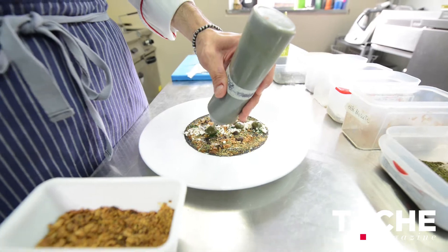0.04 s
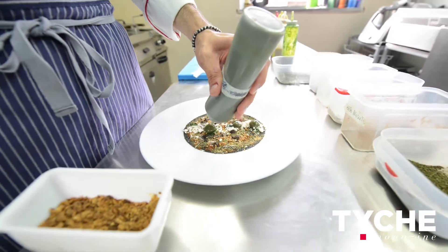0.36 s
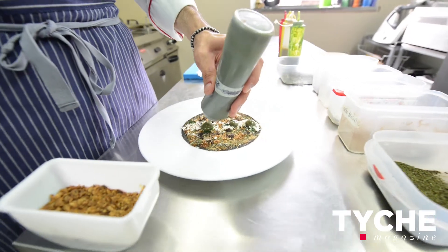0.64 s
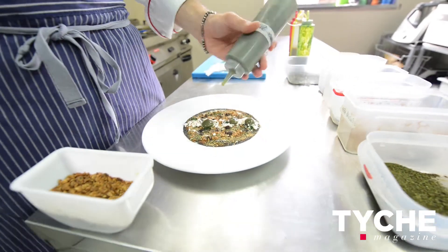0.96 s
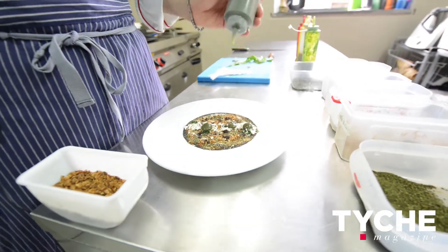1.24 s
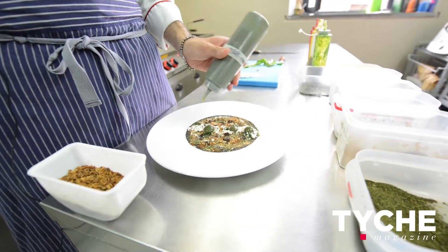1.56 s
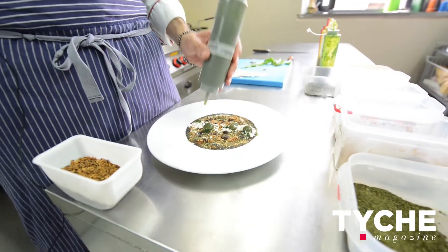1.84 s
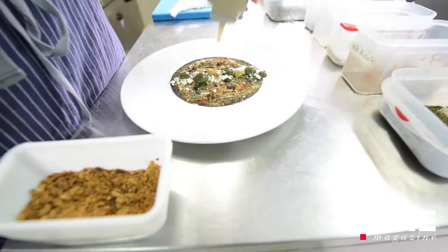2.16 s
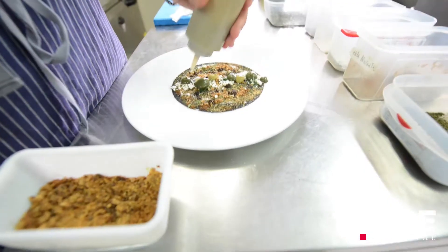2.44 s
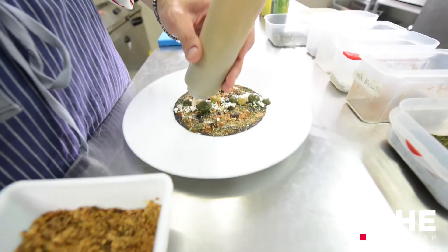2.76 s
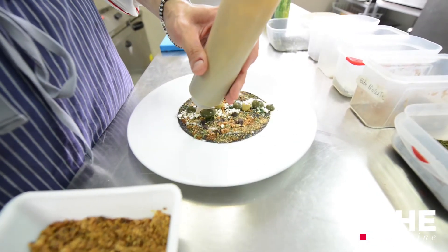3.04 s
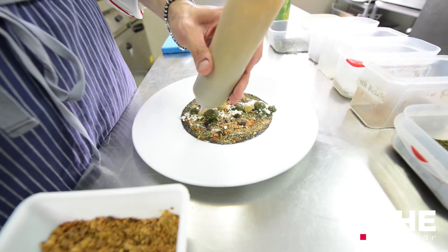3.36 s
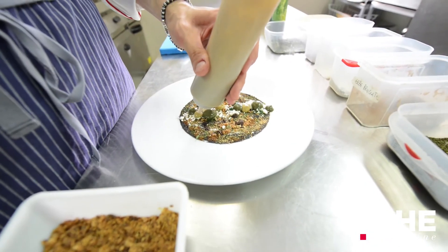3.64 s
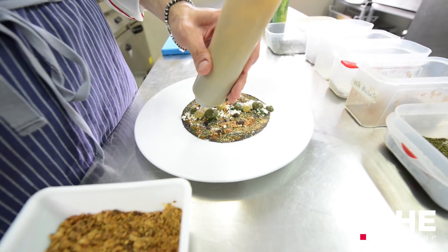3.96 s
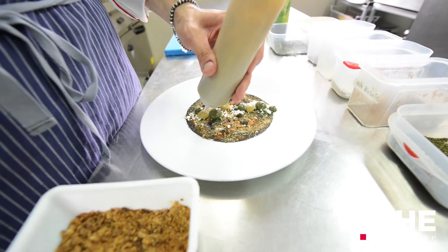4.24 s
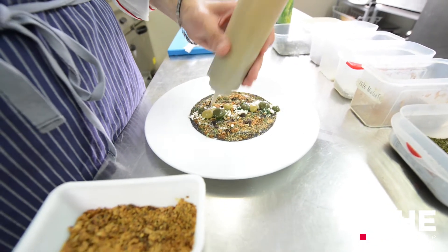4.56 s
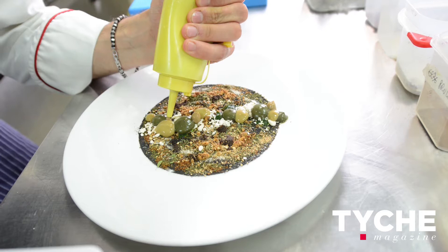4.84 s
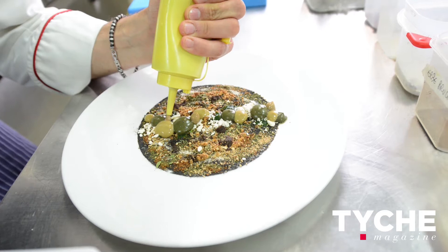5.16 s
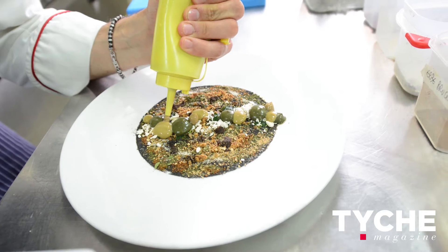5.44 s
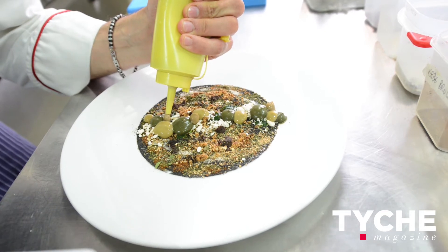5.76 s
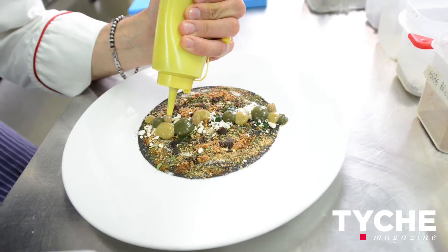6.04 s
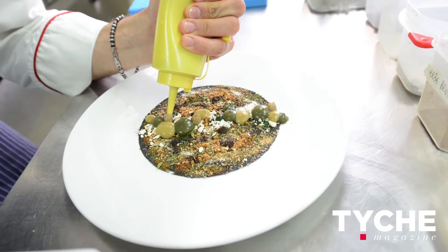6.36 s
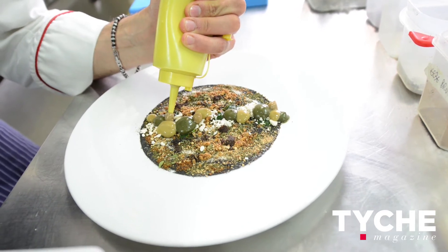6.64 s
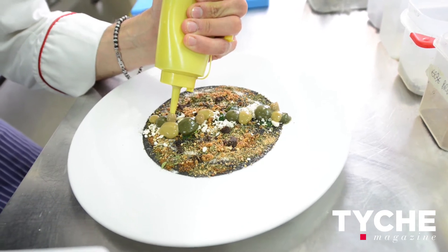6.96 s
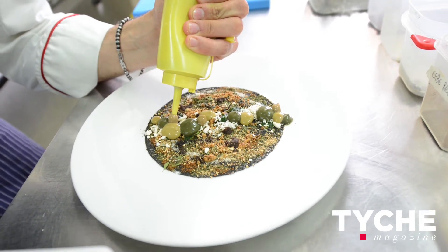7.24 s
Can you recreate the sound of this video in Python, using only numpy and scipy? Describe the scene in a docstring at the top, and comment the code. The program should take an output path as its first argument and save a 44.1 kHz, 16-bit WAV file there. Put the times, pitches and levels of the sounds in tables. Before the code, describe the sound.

Steady ventilation rush and hum in a restaurant kitchen, with faint whistling, fine rapid ticking and two soft container knocks.

```python
"""An extractor fan drones in a restaurant kitchen. Turbulent air rushes and booms in the duct,
the wheel hums at multiples of its shaft speed and grazes metal once a turn with a fine tick,
and motors add thin whistling tones. A container is set down with one soft knock.
The sound runs as a loop of about four seconds, broken once by a short silence."""
import sys
import numpy as np
from scipy import signal
from scipy.fft import rfft, irfft
from scipy.io import wavfile
from scipy.ndimage import uniform_filter1d

SR = 44100
rng = np.random.default_rng(int(sys.argv[2]) if len(sys.argv) > 2 else 0)


def bounce(signal):
    """Save signal as a 16-bit WAV file at the path given by the first command-line argument."""
    frames = np.transpose(np.atleast_2d(signal))
    limited = np.clip(frames, -1, 1)
    pcm = np.round(limited * 32767).astype(np.int16)
    wavfile.write(sys.argv[1], SR, pcm)


N = 326340
LOOP_S, SHAFT_HZ = 4.24, 17.4
LOOP_N = round(LOOP_S * SR)


def gain_of(db):
    """Decibels to a gain factor."""
    return 10 ** (np.asarray(db) / 20)


def unit_rms(x):
    """Scales to rms 1."""
    return x / np.sqrt(np.mean(x ** 2) + 1e-20)


def clock(length_s):
    """Sample times from zero."""
    return np.arange(round(length_s * SR)) / SR


def add(mix, start_s, sound):
    """Mixes a sound in at its start time."""
    part = mix[round(start_s * SR):][:len(sound)]
    part += sound[:len(part)]


def follow(curve, column=1):
    """One column of an automation curve at every sample of the loop."""
    rows = np.array(curve)
    return np.interp(clock(LOOP_S), rows[:, 0], rows[:, column])


def drift(rate_hz):
    """Smooth random modulation of rms 1, rolling off above rate_hz."""
    hz = np.fft.rfftfreq(LOOP_N, 1 / SR)
    spectrum = rfft(rng.standard_normal(LOOP_N)) * (hz > 0)
    return unit_rms(irfft(spectrum / (1 + (hz / rate_hz) ** 4), LOOP_N))


def band_noise(centre_hz, width_hz, size):
    """Noise of rms 1 in one steep-sided band."""
    hz = np.fft.rfftfreq(size, 1 / SR)
    spectrum = rfft(rng.standard_normal(size))
    return unit_rms(irfft(spectrum / (1 + (2 * (hz - centre_hz) / width_hz) ** 4), size))


def tone(hz, db, wander=0.00087):
    """A sine at an rms level, its pitch wandering slightly."""
    cycles = np.cumsum(hz * (1 + wander * drift(rate_hz=3.3))) / SR + rng.random()
    return np.sqrt(2) * gain_of(db) * np.sin(2 * np.pi * cycles)


def swell(x, curve_db):
    """Compresses a sound, then rides its level along a curve."""
    x = unit_rms(x)
    envelope = np.sqrt(uniform_filter1d(x ** 2, SR // 14) + .02)
    return gain_of(curve_db) * x / envelope


def ring(modes, t):
    """The decaying sines of a struck object."""
    return sum(gain_of(db - 60 * t / t60) * np.sin(2 * np.pi * (hz * t + rng.random()))
               for hz, db, t60 in modes)


def kitchen(x, wet_db, t60):
    """Direct sound plus dense reflections from steel and tiles."""
    t = clock(.4)
    tail = rng.standard_normal(len(t)) * gain_of(-60 * t / t60) * (t > .003)
    reverb = signal.fftconvolve(x, tail)[:len(x)]
    return x + gain_of(wet_db) * np.std(x) * unit_rms(reverb)


def air_rush(flutter_db=0.47, low_cut_hz=22):
    """Turbulent air, lifted at the duct's resonances; its level rides on the flow."""
    # broadband bed of the rush: f/Hz, density/(dB per Hz)
    bed = [(15, -44), (45, -75), (75, -52.5), (130, -48.5), (220, -52), (380, -55.5), (700, -55.5),
           (1500, -64.5), (2700, -72), (4400, -80), (6600, -82.5), (9800, -84.5), (11500, -88.5),
           (15500, -88)]
    # steady resonances of duct and room: f/Hz, width/Hz, peak density/(dB per Hz)
    resonances = [(30.4, 5.6, -49), (101.5, 9.7, -45), (108.5, 8.1, -56), (253, 58, -54.5),
                  (367, 14.4, -53.5), (488, 4.2, -50.5), (2680, 270, -76), (6580, 550, -87),
                  (9550, 500, -89)]
    # nearly even air flow with a few brief sags: t/s, level/dB
    flow = [(0.0, -0.06), (1.7, 0.0), (1.84, -2.2), (2.0, 0.04), (3.26, 0.0), (3.82, 0.1), (3.96, -1.0),
            (4.08, 0.8), (4.24, -1.5)]
    hz = np.fft.rfftfreq(LOOP_N, 1 / SR)
    bed_hz, bed_db = np.transpose(bed)
    power = gain_of(np.interp(np.log(hz + 1), np.log(bed_hz), bed_db)) ** 2
    for centre, width, db in resonances:
        power += gain_of(db) ** 2 / (1 + (2 * (hz - centre) / width) ** 4)
    power *= 1 - 1 / (1 + (hz / low_cut_hz) ** 10)
    phases = np.exp(2j * np.pi * rng.random(len(hz)))
    rush = irfft(np.sqrt(power * LOOP_N * SR / 2) * phases, LOOP_N)
    return rush * gain_of(follow(flow) + flutter_db * drift(rate_hz=16))


def duct_booms(low_trim_db=-0.5, upper_trim_db=-2.5, blades=11, throb_hz=7.2, throb_db=1.5):
    """Turbulence drives two throbbing booms in the duct; the upper one carries the blade tone."""
    # swells of the low boom: t/s, level/dB
    low_swells = [(0.0, -40), (0.38, -25.5), (0.46, -28), (0.56, -29.2), (2.06, -28), (2.14, -34),
                  (2.4, -32), (2.58, -37), (2.94, -26), (3.24, -28), (3.34, -23), (3.56, -28.5),
                  (3.68, -26.5), (4.24, -29)]
    # swells of the upper boom: t/s, level/dB
    upper_swells = [(0.0, -17), (0.12, -32), (0.22, -22.5), (0.86, -29.5), (0.94, -21), (1.46, -30.2),
                    (1.54, -23.5), (1.8, -25), (1.88, -33.5), (2.04, -25), (2.2, -34), (2.4, -20),
                    (2.78, -31.5), (2.86, -27), (3.28, -23.5), (3.42, -32), (3.68, -26.7), (4.24, -26.5)]
    low = band_noise(centre_hz=57.7, width_hz=18, size=LOOP_N)
    upper = band_noise(centre_hz=162.7, width_hz=23.6, size=LOOP_N)
    upper += tone(blades * SHAFT_HZ, db=-1.0)
    low_db = follow(low_swells) + low_trim_db + throb_db * drift(throb_hz)
    upper_db = follow(upper_swells) + upper_trim_db + throb_db * drift(throb_hz)
    return swell(low, low_db) + swell(upper, upper_db)


def wheel_hum(wander=0.0024, waver_db=1.2):
    """The fan wheel hums at multiples of the shaft speed, all following its slight wander."""
    # partials of the hum: multiple of the shaft speed, rms level/dB
    partials = [(2, -27.5), (3, -35), (6, -38), (18, -42), (23, -45), (25, -51)]
    turns = np.cumsum(SHAFT_HZ * (1 + wander * drift(rate_hz=1.0))) / SR
    hum = np.zeros(LOOP_N)
    for order, db in partials:
        amplitude = np.sqrt(2) * gain_of(db + waver_db * drift(rate_hz=1.7))
        hum += amplitude * np.sin(2 * np.pi * (order * turns + rng.random()))
    return hum


def motor_whistles(flicker_db=1.0, waver_db=1.5, upper_hz=1819.8):
    """Two leading whistles over fainter motor tones that waver in the moving air."""
    # swells of the leading whistles: t/s, lower level/dB, upper level/dB
    swells = [(0, -37, -45.5), (1.2, -36.5, -42.5), (2.1, -37, -43.5), (2.4, -34, -45.5), (3.4, -34.5, -46),
              (4.24, -33.5, -43)]
    # the lower whistle and two companions that swell with it: f/Hz, relative level/dB
    chord = [(839.8, 0), (810.2, -5), (640.6, -6.5)]
    # fainter motor tones: f/Hz, rms level/dB
    motor_tones = [(99.6, -41), (185.7, -42), (288, -56), (481.8, -42), (524.9, -40), (740.2, -45.5),
                   (939.4, -59), (1239.5, -45.5), (1383.5, -51), (1921, -71), (2145, -58), (4054, -65),
                   (4720, -63)]
    lower = sum(tone(hz, follow(swells, 1) + db + flicker_db * drift(rate_hz=5.2)) for hz, db in chord)
    upper = tone(upper_hz, follow(swells, 2) + flicker_db * drift(rate_hz=6.1))
    faint = sum(tone(hz, db + waver_db * drift(rate_hz=1.6)) for hz, db in motor_tones)
    return lower + upper + faint


def wheel_ticks(level_db=-47, spread_db=0.4, jitter_s=0.00013, scrape_db=-3, scrape_t60=0.09):
    """The wheel grazes metal once a turn: a fine, high ring with a short hiss of scraping."""
    # runs of ticks: first tick t/s, end t/s
    runs = [(.028, 2.18), (2.199, 4.24)]
    # three quick contacts within each tick: delay/s, relative level/dB
    contacts = [(0, 4), (.0016, -11), (.0025, 2)]
    # ring of the grazed metal: f/Hz, relative level/dB, t60/s
    metal_modes = [(6400, -9, .025), (9550, -10, .025), (10240, -8, .03), (10430, -8, .03),
                   (11400, -8, .03), (12500, -4, .025), (12820, -5, .025), (13850, -4, .012),
                   (14400, 0, .016), (14600, -2, .016), (15330, 0, .016), (15620, -3, .016)]
    hits = np.zeros(LOOP_N)
    for first, end in runs:
        for tick_s in np.arange(first, end, 1 / SHAFT_HZ):
            force_db = -spread_db * rng.standard_normal()
            for delay, db in contacts:
                add(hits, tick_s + delay + jitter_s * rng.standard_normal(), gain_of([force_db + db]))
    t = clock(0.11)
    ringing = signal.fftconvolve(hits, ring(metal_modes, t))[:LOOP_N]
    scrape_envelope = signal.fftconvolve(hits, gain_of(-60 * t / scrape_t60))[:LOOP_N]
    scrape = scrape_envelope * band_noise(centre_hz=8700, width_hz=14000, size=LOOP_N)
    ticks = unit_rms(ringing) + gain_of(scrape_db) * unit_rms(scrape)
    return gain_of(level_db) * unit_rms(kitchen(ticks, wet_db=-9, t60=.14))


def container_knock(start_s=.876, ring_db=-29.5, rise_s=0.00071, clack_db=-38, clack_t60=0.12):
    """A container meets the counter: a dull ring and a brief bright clack, half buried in the drone."""
    # ring of the knock: f/Hz, relative level/dB, t60/s
    body_modes = [(710, 14, 0.058), (920, 3, 0.054), (1180, 3.5, 0.021), (1374, 9.5, 0.055),
                  (1580, 0, 0.051)]
    t = clock(.2)
    bright = band_noise(centre_hz=6100, width_hz=1500, size=len(t))
    clack = bright * gain_of(clack_db - 60 * t / clack_t60)
    body = gain_of(ring_db) * ring(body_modes, t)
    attack = 1 - np.exp(-t / rise_s)
    knock = np.zeros(LOOP_N)
    add(knock, start_s, (body + clack) * attack)
    return kitchen(knock, wet_db=-9, t60=0.62)


def scene():
    """The fan and the knock, looped through two stretches with a short silence between."""
    # stretches in which the loop plays: start t/s, end t/s, offset into the loop/s
    stretches = [(0, 4.686, 0), (4.764, 7.41, 3.884)]
    loop = air_rush() + duct_booms() + wheel_hum() + motor_whistles() + wheel_ticks() + container_knock()
    loop *= signal.windows.tukey(LOOP_N, .0004)  # tiny fades keep the seam from clicking
    mix = np.zeros(N)
    for start, end, offset in stretches:
        playhead = round(offset * SR) + np.arange(round((end - start) * SR))
        add(mix, start, loop[playhead % LOOP_N] * signal.windows.tukey(len(playhead), .001))
    return mix[None]


def record(dry):
    """A steep high cut at 15.8 kHz."""
    lowpass = signal.firwin(1023, 15800, window=("kaiser", 9), fs=SR)
    return signal.oaconvolve(dry, lowpass[None], "same")


dry = scene()
out = record(dry)
bounce(out)
```